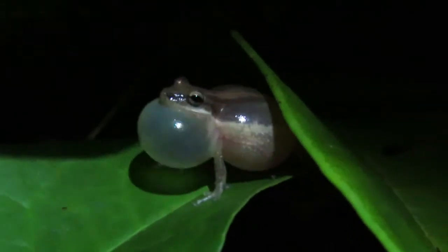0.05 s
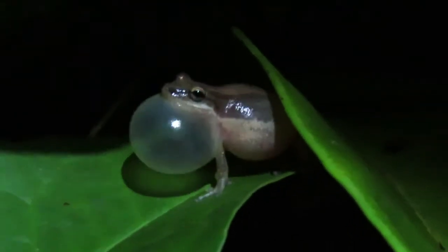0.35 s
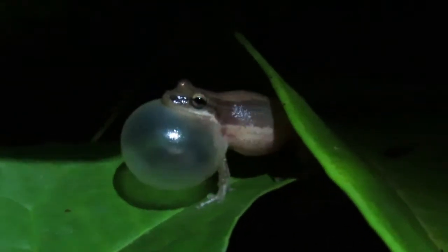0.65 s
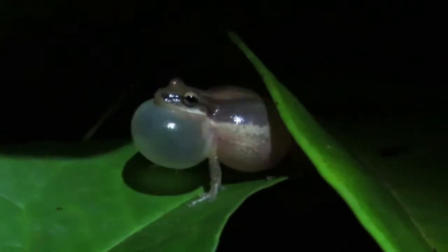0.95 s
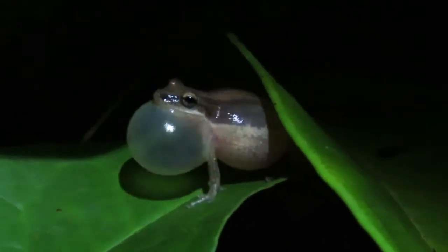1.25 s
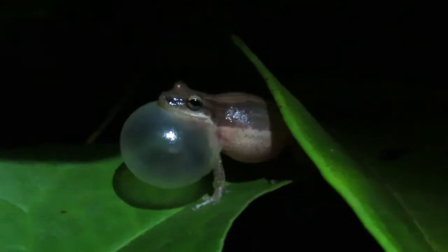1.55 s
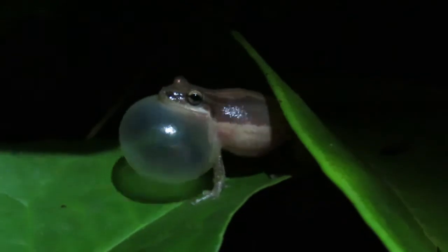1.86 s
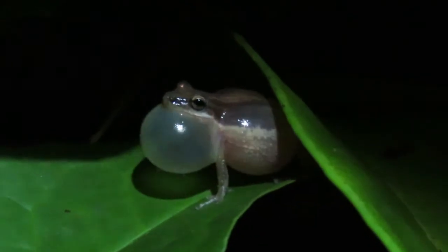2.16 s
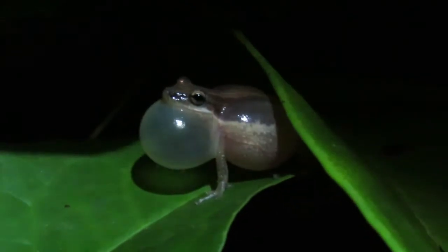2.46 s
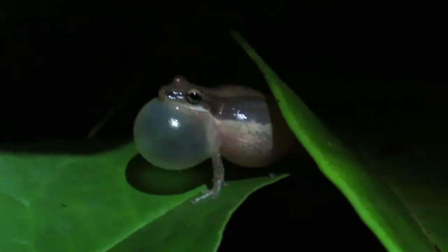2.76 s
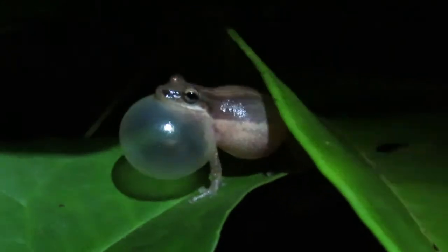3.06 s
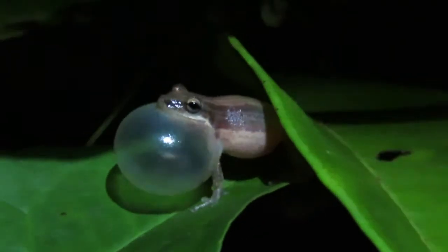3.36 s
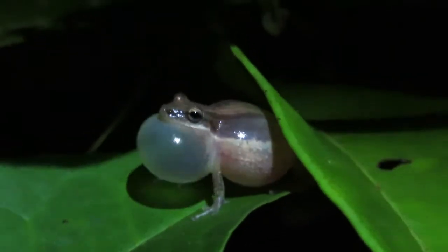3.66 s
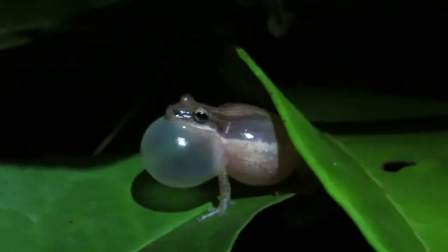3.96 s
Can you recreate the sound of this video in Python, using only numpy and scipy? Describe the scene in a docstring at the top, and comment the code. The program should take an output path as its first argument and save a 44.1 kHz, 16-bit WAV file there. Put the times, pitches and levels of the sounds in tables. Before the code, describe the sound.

A small tree frog close by gives three high, buzzy trills, each about 0.6 seconds long, starting near 0.2, 1.2 and 2.8 seconds. Quieter frogs answer with similar trills in between and near the end, over a distant, fluttering chorus that swells and ebbs throughout. Another kind of frog adds soft, lower, falling whines at the start and around 2.3 seconds, above a faint hush of night air.

```python
"""Three buzzy trills from a small tree frog, close by on a leaf at night.
Each trill is a run of clicks that ring the frog's swelling vocal sac. Neighbours of its kind answer
from the reeds over the fluttering band of a far chorus. A frog of another kind gives soft, falling
whines, and faint night air lies under it all."""
import sys
import numpy as np
from scipy import signal
from scipy.fft import rfft, irfft
from scipy.io import wavfile

SR = 44100
rng = np.random.default_rng(int(sys.argv[2]) if len(sys.argv) > 2 else 0)


def to_wav(sig):
    """Store sig (one row per channel, or 1-D mono) as 16-bit WAV at the path in sys.argv[1].

    Samples outside -1..1 are clipped; the rate is SR.
    """
    pcm = np.clip(np.atleast_2d(sig), -1, 1) * 32767
    pcm = np.round(pcm).astype(np.int16)
    wavfile.write(sys.argv[1], SR, pcm.T)  # frames by channels


N = 176400
T = np.arange(N) / SR

# How well a vocal sac radiates. Each row: frequency in Hz, gain in dB.
SAC_RADIATION = [(170, -36), (350, -33.5), (900, -26), (1900, -19), (2700, -8), (4000, 3.5), (4750, 8),
                 (5050, 2), (5400, -10), (6600, -24), (7500, -16), (8500, -28), (9300, -50.5), (15000, -51)]


def near_frog():
    """Close trills: the sac's ring shifts as it fills and dips in pitch as the push weakens."""
    # One envelope a trill. Each row: time in seconds, level in dB.
    trills = [
        [(0.232, -29.5), (0.246, -21), (0.32, -16.5), (0.73, -17.5), (0.79, -25), (0.812, -43)],
        [(1.24, -36.5), (1.256, -22), (1.314, -16.5), (1.78, -17), (1.838, -22.5), (1.85, -35), (1.86, -51)],
        [(2.792, -29), (2.818, -17), (3.334, -17), (3.404, -20), (3.43, -26.5), (3.44, -45)],
    ]
    # The pace of every trill. Each row: seconds into the call, clicks per second before waver and stumbles.
    rate_curve = [(0, 173), (.08, 172), (.13, 174.5), (.4, 167.5), (.5, 163.5), (.6, 164.5)]
    # Late in a call the clicks stumble. Each row: centre and half-length in seconds,
    # scatter as a share of the period, slowing as a share of the rate.
    stumbles = [(0.737, 0.021, 0.016, 0.023), (1.732, 0.021, .05, 0.093), (3.248, 0.011, 0.046, .12),
                (3.303, 0.011, 0.056, 0.093)]
    # Sac resonances. Each row: Hz slack, Hz swollen, relative dB slack and swollen, width in Hz.
    sac = [(2978, 3011, 2, 0, 130), (3420, 3490, 0, -11, 230), (3830, 3935, -10, 0, 95),
           (4470, 4410, -5, -9, 170), (4630, 4750, -7, -5, 320), (5450, 5480, -28, -20, 150),
           (5955, 5940, -27, -11, 110), (7900, 7985, -20, -15, 100), (8320, 8420, -9, -3, 160)]
    swell_s, slacken_s, slacken_share = .16, .04, .3
    pitch_per_db, full_effort_db, shimmer_db = .0018, -16, .5

    def jitter(t):
        return .0015 + sum(scatter for at, span, scatter, _ in stumbles if abs(t - at) < span)

    waver = .0055 * band_noise(11, 44)
    drag = sum(slowing * np.exp(-((T - at) / span) ** 2) for at, span, _, slowing in stumbles)
    out = 0
    for trill in trills:
        seconds, db = np.transpose(trill)
        start, end = seconds[0], seconds[-1]
        rate = np.interp(T - start, *np.transpose(rate_curve)) * (1 + waver - drag)
        times = click_times(start, end, lambda t: rate[min(int(t * SR), N - 1)], jitter)
        level = np.interp(times, seconds, db)
        swollen = 1 - np.exp(-((times - start) / swell_s) ** 2)
        swollen -= slacken_share * np.exp((times - end) / slacken_s)
        tuning = 1 + pitch_per_db * (level - full_effort_db)
        level += shimmer_db * rng.standard_normal(len(times))
        out += ring_sac(times, level, swollen, sac, tuning[:, None])
    return reed_scatter(colour(out, SAC_RADIATION), echo_db=-22, side_db=3.5)


def click_times(start, end, rate, jitter):
    """One click after another at rate(t) per second, each period uneven by the share jitter(t)."""
    times = [start]
    for chance in rng.standard_normal(200):
        now = times[-1]
        times.append(now + max(1 + jitter(now) * chance, .5) / rate(now))
    times = np.array(times)
    return times[(times < end) & (times > 0) & (times < T[-1])]


def ring_sac(times, db, swollen, sac, tuning=1, size=640):
    """Each click rings the sac's resonances as they stand at that moment of the swell."""
    index = np.ceil(times * SR).astype(int)[:, None] + np.arange(size)
    age, full = index / SR - times[:, None], swollen[:, None]
    rings = 0
    for slack_hz, full_hz, slack_db, full_db, width_hz in sac:
        wobble = 1 + .001 * rng.standard_normal(full.shape)
        hz = tuning * (slack_hz + (full_hz - slack_hz) * full) * wobble
        gain = width_hz * from_db(slack_db + (full_db - slack_db) * full)
        rings += gain * np.exp(-np.pi * width_hz * age) * np.sin(2 * np.pi * hz * age)
    # Scale the rings so that the trill stands at db once the caller applies SAC_RADIATION.
    bin_hz = np.arange(size // 2 + 1) * SR / size
    radiated = rfft(rings) * from_db(np.interp(bin_hz, *np.transpose(SAC_RADIATION)))
    power = 2 * np.sum(np.abs(radiated) ** 2, axis=1) / (size * SR * np.median(np.diff(times)))
    rings *= (from_db(db) / np.sqrt(power))[:, None]
    return np.bincount(index.ravel(), rings.ravel(), N + size)[:N]


def neighbours():
    """Trills from farther off: each grows, slows a little and is blurred by the reeds."""
    # Each row: start and length in seconds, full level in dB, opening clicks per second,
    # sac pitch ratio, lift in dB of the resonances above 4.2 kHz.
    answers = [(-.45, 0.59, -31.5, 180, 0.93, 5.5), (.83, 0.59, -25.5, 171, 1.0, 6),
               (1.05, 0.52, -29, 200, 1.1, -2), (1.99, 0.47, -28, 208, 0.95, -15.5),
               (2.18, 0.56, -25, 170, .99, 9), (3.44, 0.44, -25.5, 174, 1.02, 3),
               (3.6, 0.43, -27.5, 162, 1.05, -10.5)]
    # Sac resonances before each frog's pitch ratio and lift.
    # Each row: Hz slack, Hz swollen, relative dB slack and swollen, width in Hz.
    base_sac = [(2850, 3300, -5.5, -1, 210), (3560, 3560, 10.5, 3, 48), (3866, 3900, -4, 2.5, 220),
                (4400, 4590, -10.5, -4, 60), (8600, 8900, -17, -20.5, 250)]
    rise_s, rise_db, fade_s, swell_s = .31, 12.5, .05, .25
    sag_hz_per_s, shimmer_db = 16, 2
    out = 0
    for start, length, db, rate, pitch, bright_db in answers:
        times = click_times(start, start + length, lambda t: rate - sag_hz_per_s * (t - start),
                            jitter=lambda t: .004)
        age = times - start
        level = db - rise_db * np.maximum(1 - age / rise_s, 0) - 10 * np.exp((age - length) / fade_s)
        level += shimmer_db * rng.standard_normal(len(age))
        swollen = 1 - np.exp(-(age / swell_s) ** 2)
        sac = np.array(base_sac) * [pitch, pitch, 1, 1, 1]
        sac[sac[:, 0] > 4200, 2:4] += bright_db
        out += ring_sac(times, level, swollen, sac)
    return reed_scatter(colour(out, SAC_RADIATION), echo_db=-9, side_db=-4)


def whining_frog():
    """A nasal start, then a nearly pure tone that slides down."""
    # Each row: start of the fall in seconds, base level in dB, top pitch in Hz.
    whines = [(.07, -47.5, 868), (1.217, -60, 861), (1.593, -63, 884), (2.274, -45, 871), (4.03, -43, 853)]
    # One whine's envelope. Each row: seconds from the start of the fall, gain in dB.
    envelope = [(-.11, -59), (-.06, -17.5), (-.03, -10), (0, 1), (.06, -1.5), (.085, -8), (.135, -9),
                (.17, -28), (.21, -69.5)]
    # Each row: multiple of the pitch, gain in dB before the fall and late in it.
    partials = [(1, 0, 3), (1.5, -5, -45), (2, -3, -26), (3, -12, -10)]
    end_hz, fall_s, fall_curve = 528, .055, 1.4
    out = 0
    for fall_at, db, top_hz in whines:
        fallen = 1 - np.exp(-(np.maximum(T - fall_at, 0) / fall_s) ** fall_curve)
        phase = 2 * np.pi * np.cumsum(top_hz + (end_hz - top_hz) * fallen) / SR
        level = db + np.interp(T - fall_at, *np.transpose(envelope), left=-np.inf, right=-np.inf)
        tone = sum(from_db(early + (late - early) * fallen) * np.sin(multiple * phase)
                   for multiple, early, late in partials)
        out += from_db(level) * tone
    return reed_scatter(out, echo_db=-5.5, side_db=-2.5)


def far_chorus():
    """A fluttering band of noise stands for many distant trills merging."""
    # Each row: frequency in Hz, relative level in dB.
    spectrum = [(900, -51), (1900, -30), (2300, -26.5), (2700, -10), (3600, 0), (4700, -2), (5300, -20.5),
                (6000, -28), (7500, -41.5), (8600, -56), (9500, -55), (15000, -53)]
    # The chorus swells and ebbs. Each row: time in seconds, level in dB.
    swells = [(0, -34), (.3, -28), (.82, -34.5), (1.2, -27), (1.4, -28), (1.9, -35.5), (2.5, -27),
              (2.78, -29), (2.88, -23), (3.43, -34), (3.75, -29), (4, -28.5)]
    flutter_hz, flutter_depth = 175, .1
    flutter = np.exp(flutter_depth * band_noise(flutter_hz * .85, flutter_hz * 1.15))
    band = rms_one(colour(stereo_noise(side_db=-12) * flutter, spectrum))
    return from_db(np.interp(T, *np.transpose(swells))) * band


def night_air():
    """A faint, wide, dark hush."""
    # Each row: frequency in Hz, relative level in dB.
    spectrum = [(25, -19), (80, -1.5), (160, -0.5), (300, 2.5), (600, 4), (1200, 2), (3000, -26.5),
                (9500, -27.5), (12500, -28), (15000, -30)]
    return from_db(-65) * rms_one(colour(stereo_noise(side_db=2), spectrum))


def reed_scatter(x, echo_db, side_db, t60_s=.092):
    """Direct sound plus a short, dense scatter from the plants."""
    tail = (stereo_noise(side_db) * from_db(-60 * T / t60_s))[:, :SR // 2]
    tail /= np.sqrt(np.sum(tail ** 2) / 2)
    return x + from_db(echo_db) * signal.fftconvolve(x[None], tail, axes=1)[:, :N]


def colour(x, points):
    """Minimum-phase EQ through the given (Hz, dB) points."""
    hz, db = np.transpose(points)
    size = 2 * N
    curve_db = np.interp(np.log(np.arange(N + 1) * SR / size + 1), np.log(hz), db)
    cepstrum = irfft(np.log(from_db(curve_db)))
    cepstrum[1:N] *= 2  # folded onto positive time, so nothing rings ahead of a click
    cepstrum[N + 1:] = 0
    return irfft(rfft(x, size) * np.exp(rfft(cepstrum)))[..., :N]


def band_noise(low_hz, high_hz):
    """Random motion within a band, at unit rms."""
    band = signal.butter(2, [low_hz, high_hz], "band", fs=SR, output="sos")
    return rms_one(signal.sosfilt(band, rng.standard_normal(N)))


def stereo_noise(side_db):
    """Mid-side white noise; side_db sets the width."""
    mid, side = rng.standard_normal((2, N))
    return mid + from_db(side_db) * side * np.array([[1], [-1]])


def from_db(db):
    """Decibels to gain."""
    return 10 ** (np.asarray(db) / 20)


def rms_one(x):
    """Scale to unit rms."""
    return x / np.sqrt(np.mean(x ** 2) + 1e-20)


def scene():
    """All the frogs over faint night air."""
    return near_frog() + neighbours() + far_chorus() + whining_frog() + night_air()


def record(dry):
    """A soft clip rounds the highest peaks; a steep low-pass cuts the top."""
    ceiling, knee, stop_hz = .88, 9, 15800
    rounded = dry / (1 + np.abs(dry / ceiling) ** knee) ** (1 / knee)
    return signal.sosfilt(signal.cheby2(12, 70, stop_hz, fs=SR, output="sos"), rounded)


dry = scene()
out = record(dry)
to_wav(out)
```